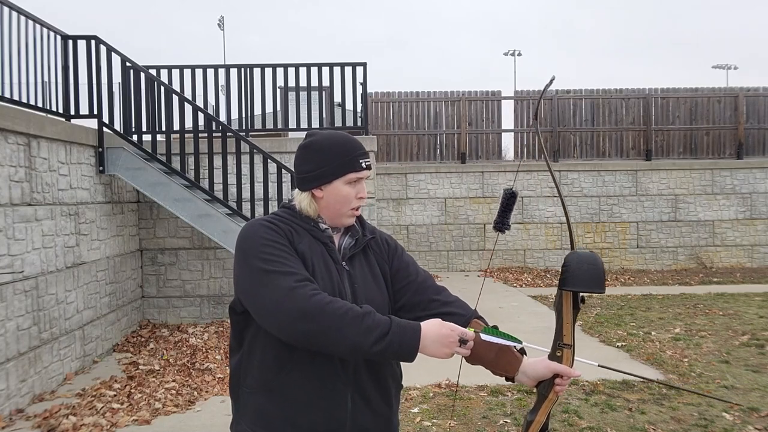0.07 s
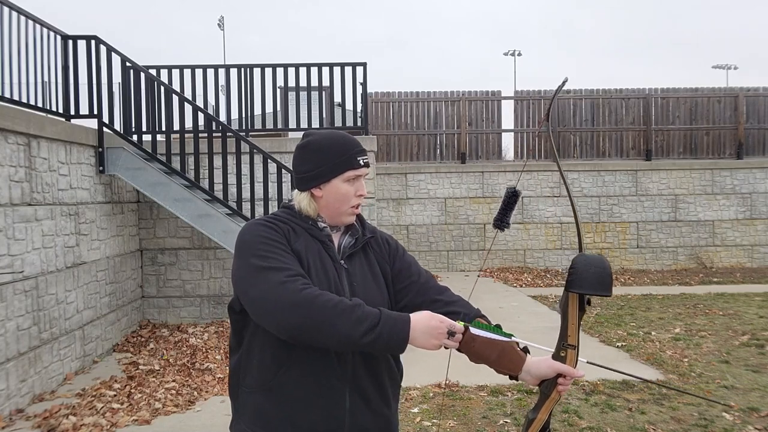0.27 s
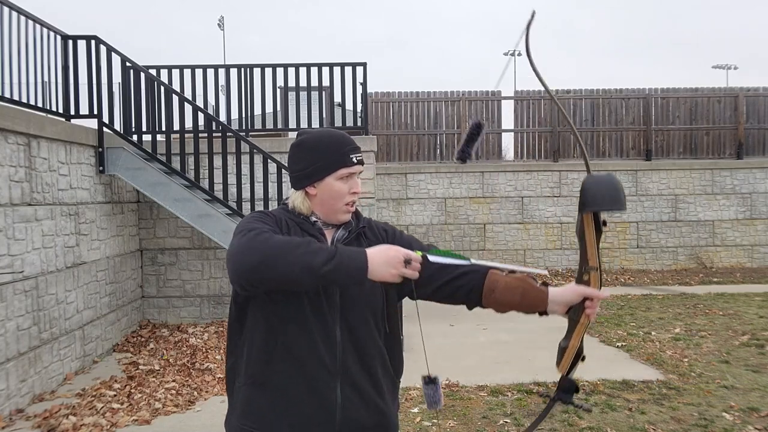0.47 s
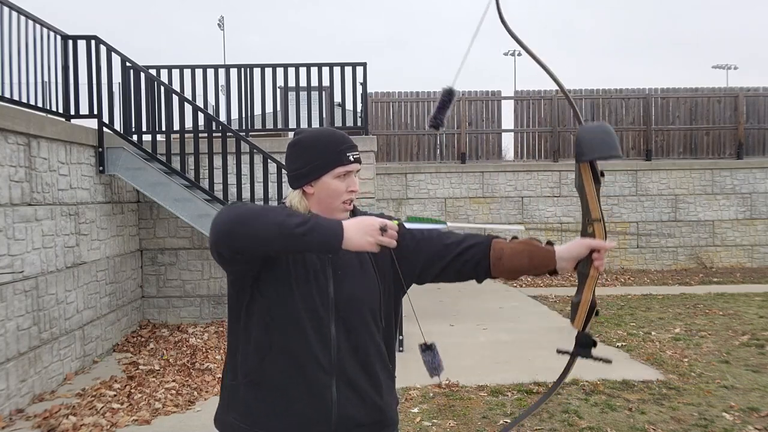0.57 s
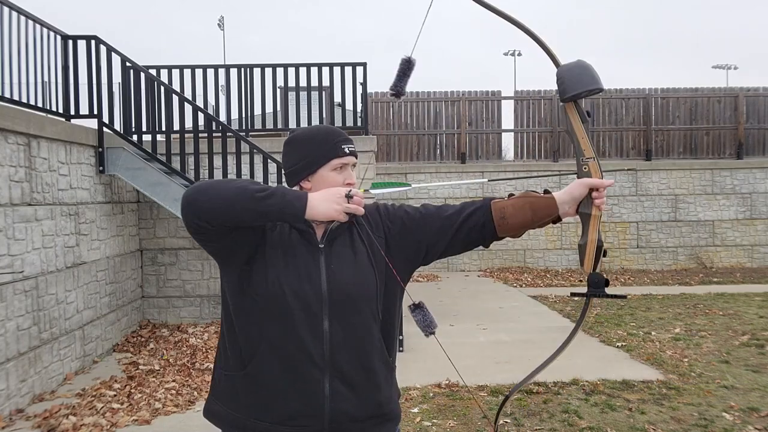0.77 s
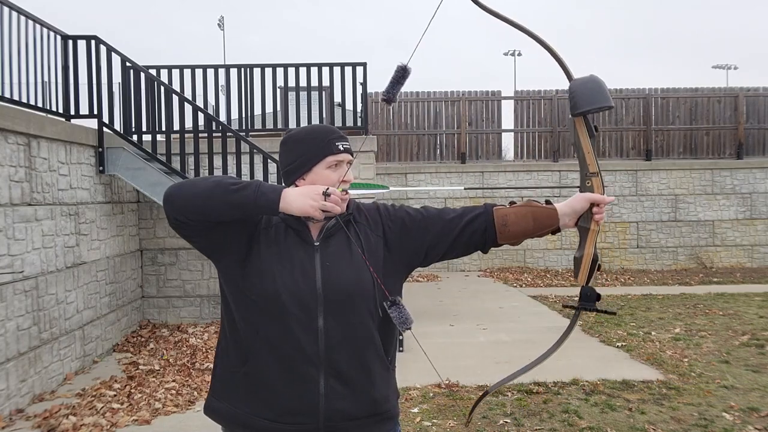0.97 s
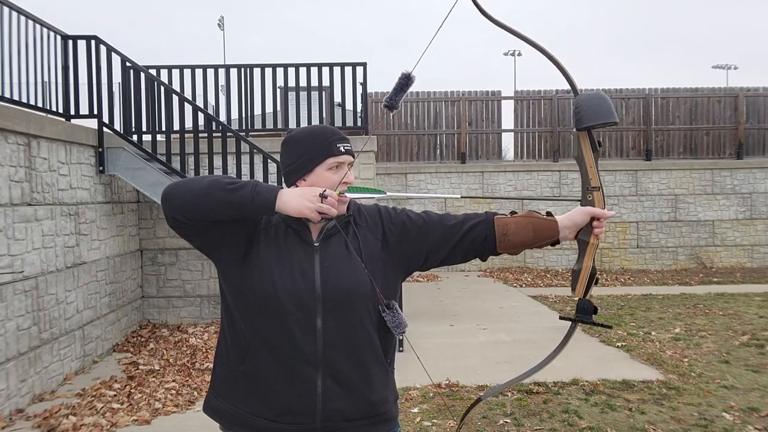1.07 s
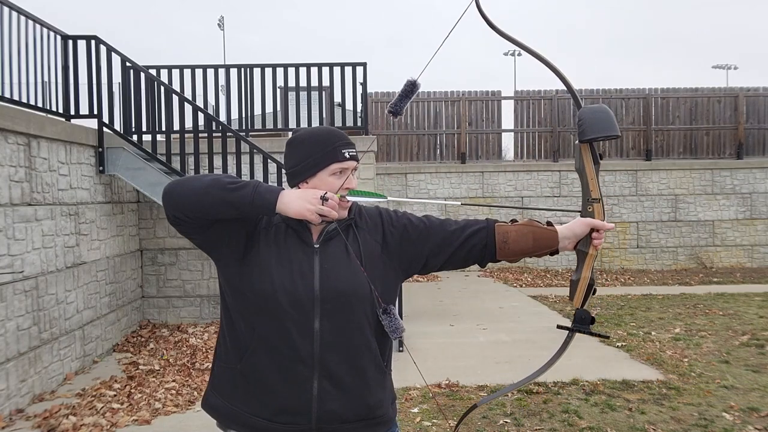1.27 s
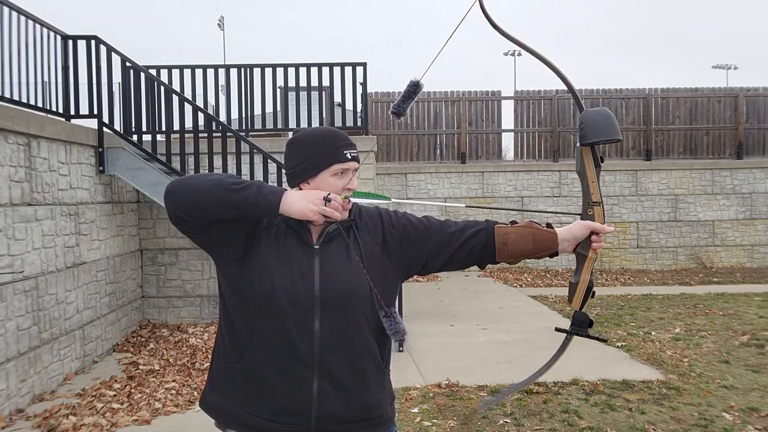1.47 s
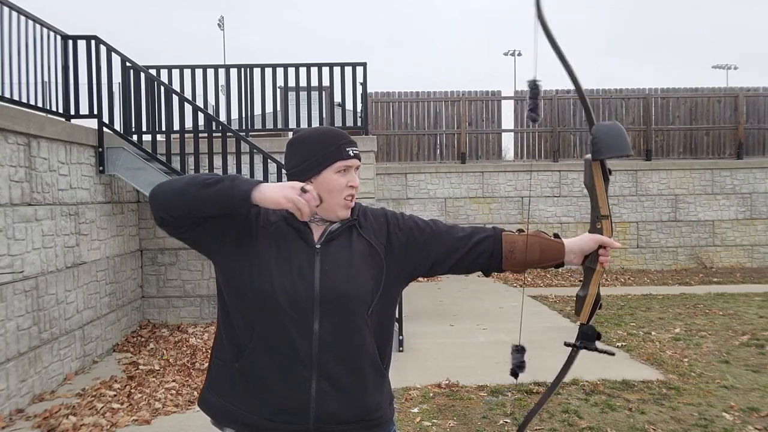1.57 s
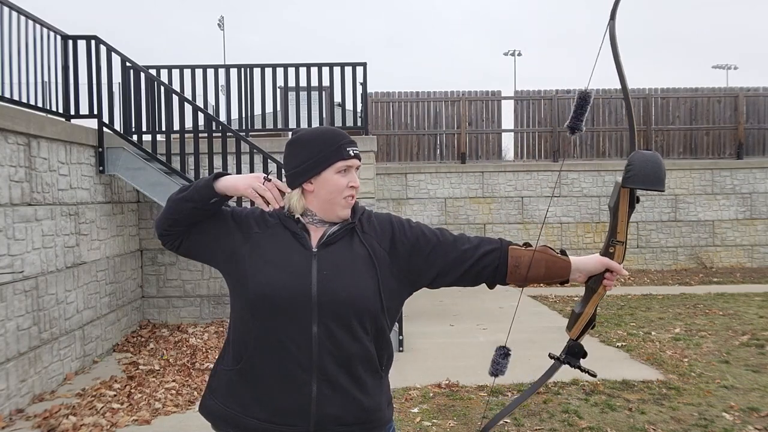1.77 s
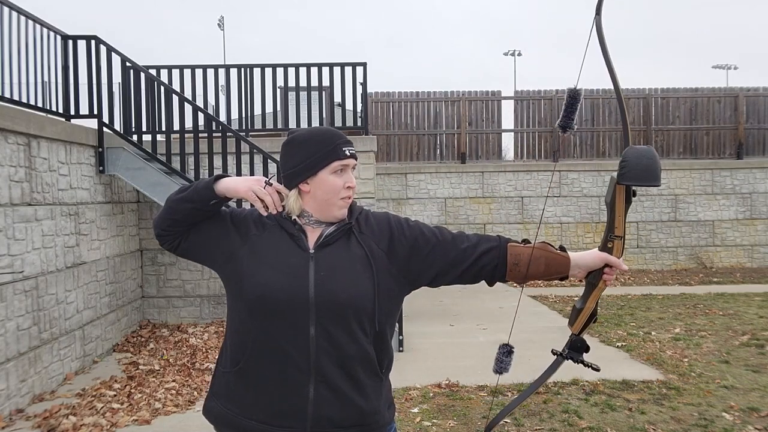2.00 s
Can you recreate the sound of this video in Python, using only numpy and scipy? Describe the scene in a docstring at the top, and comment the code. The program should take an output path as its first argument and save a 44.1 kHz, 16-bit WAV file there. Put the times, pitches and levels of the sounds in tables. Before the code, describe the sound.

Sharp woody slap of a recurve bow releasing, followed by a quick distant arrow impact outdoors

```python
"""Bow shot in a walled yard

A recurve bow is drawn: friction noise through shaft resonances as the shaft slides over the rest.
The string is loosed: coloured grit rasps, slaps ring limbs and riser as dying sines, ticks snap.
The arrow thuds into the target (struck modes, crunch noise); the walls throw it back as echoes and tails.
A low drone wavering in pitch and a distant noise wash lie under everything."""
import sys
import numpy as np
from scipy import signal
from scipy.fft import rfft, irfft
from scipy.io import wavfile
from scipy.ndimage import uniform_filter1d

SR = 44100
rng = np.random.default_rng(int(sys.argv[2]) if len(sys.argv) > 2 else 0)


def log_audio(samples):
    """Write samples as a 16-bit WAV file to the path given in sys.argv[1]."""
    # one column per channel
    frames = np.atleast_2d(samples).T
    # limit to full scale, then quantise
    limited = np.clip(frames, -1, 1)
    pcm = np.round(limited * 32767).astype(np.int16)
    wavfile.write(sys.argv[1], SR, pcm)


N = 89743

# decay of the yard's reflections: f/Hz, t60/s
YARD_DECAY = [(100, 0.1), (500, 0.22), (2000, .35), (6000, 0.19), (14000, 0.26)]
# decay from the farther walls: f/Hz, t60/s
FAR_DECAY = [(100, .5), (500, 0.44), (2000, 0.44), (6000, 0.7), (14000, .25)]
BACKGROUND_PAN_DB = -0.86  # left minus right


def amp(db):
    """Amplitude factor of a level in dB."""
    return 10 ** (np.asarray(db) / 20)


def evened(x):
    """Scale to unit RMS over all channels."""
    return x / np.sqrt(np.mean(x ** 2) + 1e-20)


def read(points, hz):
    """Interpolate (Hz, value) points along log frequency."""
    f, value = np.transpose(points)
    return np.interp(np.log(hz + 1), np.log(f + 1), value)


def level(curve, col=1):
    """Gain over the whole scene from (s, dB) points, -140 dB outside."""
    columns = np.transpose(curve)
    return amp(np.interp(np.arange(N) / SR, columns[0], columns[col], left=-140, right=-140))


def add(mix, s, sound):
    """Add a sound to the mix in place from time s, cut at the end."""
    part = mix[round(s * SR):][:len(sound)]
    part += sound[:len(part)]


def balance(pan_db):
    """Left and right gains, pan_db apart."""
    return amp([[pan_db / 2], [-pan_db / 2]])


def coloured(x, points):
    """Shape a spectrum by (Hz, dB) points, then scale to unit RMS."""
    hz = np.fft.rfftfreq(x.shape[-1], 1 / SR)
    return evened(irfft(rfft(x) * amp(read(points, hz)), x.shape[-1]))


def ring(modes, tilt_db_per_khz=0, turn=1):
    """Dying sines of a struck object, peak near 1; negative turn alternates the modes' polarity."""
    t = np.arange(SR // 4) / SR
    x = 0
    for k, (hz, db, t60) in enumerate(modes):
        decay = amp(db - tilt_db_per_khz * hz / 1000 - 60 * t / t60)
        x = x + turn ** k * decay * np.sin(2 * np.pi * hz * t)
    return x / sum(amp(db) for hz, db, t60 in modes) * 2


def placed(x, lead_s, pan_db):
    """Stereo position by arrival time (positive: left first) and level (positive: left louder)."""
    hz = np.fft.rfftfreq(len(x), 1 / SR)
    side = np.array([[1], [-1]])
    delay = np.exp(1j * np.pi * hz * (side - np.sign(lead_s)) * lead_s)
    return irfft(rfft(x) * delay, len(x)) * balance(pan_db)


def pair(draw, same):
    """Two channels sharing a fraction of their noise power."""
    same = np.clip(same, 0, 1)
    return np.sqrt(same) * draw[0] + np.sqrt(1 - same) * draw[1:]


def yard(x, decay):
    """Sparse reflections of random sign, each band dying at its own speed."""
    taps = np.zeros((2, SR // 2))
    slots = np.arange(300, SR // 2 - 20, 20)
    shape = (2, len(slots))
    at = slots + rng.integers(0, 20, shape)
    np.put_along_axis(taps, at, rng.choice([-1., 1.], shape), 1)
    hz, t, z = signal.stft(taps, SR, nperseg=256)
    tail = signal.istft(z * amp(-60 * t / read(decay, hz)[:, None]), SR, nperseg=256)[1]
    return signal.fftconvolve(x[None], tail / np.linalg.norm(tail[0]), axes=1)[:, :N]


def wander(s, count):
    """Slow chance: noise averaged twice over s seconds, unit RMS."""
    size = int(s * SR)
    noise = rng.standard_normal((count, N))
    return [evened(uniform_filter1d(uniform_filter1d(v, size), size)) for v in noise]


def resonate(x, hz, width_hz):
    """A steep resonance: one peak filter applied twice, unit RMS."""
    b, a = signal.iirpeak(hz, hz / width_hz, SR)
    return evened(signal.lfilter(b, a, signal.lfilter(b, a, x)))


def background():
    """Distant wash: noise with drifting time-frequency patches, slowly fading, over faint steady hiss."""
    # wash spectrum: f/Hz, level/dB per Hz (relative)
    wash_colour = [(50, -32), (85, 0.5), (108, -5), (205, -13.5), (304, -24), (354, -17), (425, -31),
                   (451, -27), (660, -21.5), (1090, -28.5), (1450, -30.5), (3200, -54), (4160, -84),
                   (7040, -120)]
    # left-right correlation of the wash: f/Hz, correlation (-1 to 1)
    likeness = [(60, 0.9), (150, 0.93), (380, 0.72), (950, -0.23), (2380, 0.98), (5980, 0.03),
                (15000, -0.55)]
    # hiss spectrum: f/Hz, level/dB per Hz (relative)
    hiss_colour = [(1500, -8), (3000, 1), (5000, -5.5), (9000, -10), (13000, -15.5), (16000, -6)]
    wash_db, hiss_db, patch_rms_db = -56.5, -89.5, 1.5
    fade_db_per_s = -2  # 0 dB at mid-scene
    frames, hz = N // 512 + 5, np.fft.rfftfreq(2048, 1 / SR)
    a, b, c, d, patches = rng.standard_normal((frames, 1025, 5)).T
    # smooth over 16 bins, then 8 frames
    patches = evened(uniform_filter1d(uniform_filter1d(patches, size=16, axis=0), size=8, axis=1))
    same = np.clip(read(likeness, hz), -1, 1)[:, None]
    left = a + 1j * b
    right = same * left + np.sqrt(1 - same ** 2) * (c + 1j * d)
    z = np.array([left, right]) * amp(read(wash_colour, hz)[:, None] + patch_rms_db * patches)
    wash = amp(wash_db) * evened(signal.istft(z, nperseg=2048, noverlap=1536)[1][:, :N])
    fade = amp(fade_db_per_s * (np.arange(N) - N / 2) / SR)
    hiss = amp(hiss_db) * coloured(rng.standard_normal((2, N)), hiss_colour)
    return (wash * fade + hiss) * balance(BACKGROUND_PAN_DB)


def drone():
    """A steady-level low sine whose pitch wavers at random, in low-frequency rumble noise."""
    # hum pitch: t/s, f/Hz
    pitch = [(0.0, 62.6), (0.16, 62.6), (0.3, 61.3), (2.03, 61.3)]
    # rumble spectrum: f/Hz, level/dB per Hz (relative)
    rumble_colour = [(15, -40.5), (30, -7.5), (50, 4), (65, 7), (90, 0.5), (140, -50)]
    hum_db, rumble_db = -53, -66
    wobble_rms_hz, wobble_s = 3, 0.019
    hz = np.interp(np.arange(N) / SR, *np.transpose(pitch)) + wobble_rms_hz * wander(wobble_s, count=1)[0]
    hum = amp(hum_db) * np.sqrt(2) * np.sin(2 * np.pi * np.cumsum(hz) / SR)
    rumble = amp(rumble_db) * coloured(rng.standard_normal(N), rumble_colour)
    return (hum + rumble) * balance(BACKGROUND_PAN_DB)


def slide():
    """Friction noise through shaft resonances, which take turns as the free length changes."""
    # draw over the rest: t/s, level/dB
    stroke = [(0.2, -91), (0.312, -76.5), (0.394, -73), (0.512, -75.5), (0.518, -74.5), (0.59, -71.5),
              (0.596, -69.5), (0.8, -102)]
    # shaft resonances: f/Hz, width per filter pass/Hz, level/dB, loudest at t/s
    shaft = [(1310, 130, 4.5, .46), (3673, 114, -6.5, .57), (3720, 320, -7.5, 0.3), (4770, 870, -6.5, 0.41),
             (5700, 170, -25, 0.7), (5870, 600, -10, 0.28), (6800, 600, -4, 0.14)]
    spread_s, hiss_db, same = .13, -10, .5
    judder_rms_db, judder_s = 1.5, 0.019
    t = np.arange(N) / SR
    noise = pair(rng.standard_normal((3, N)), same)
    rings = np.zeros((2, N))
    for hz, width_hz, db, s in shaft:
        turn = np.exp(-((t - s) / spread_s) ** 2)
        rings += amp(db) * turn * resonate(noise, hz, width_hz)
    band = signal.butter(4, [3000, 7500], "band", fs=SR, output="sos")
    hiss = amp(hiss_db) * evened(signal.sosfilt(band, noise))
    judder = amp(judder_rms_db * wander(judder_s, count=1)[0])
    return level(stroke) * judder * (rings + hiss)


def rasp():
    """Shaft and string rush past the bow: dense uneven grit coloured by the bow, its top band dying first."""
    # rush: t/s, main level/dB, top-band level/dB
    rush = [(1.488, -50, -53.5), (1.4974, -38.5, -57.5), (1.4984, -18.5, -33), (1.506, -19.5, -33.5),
            (1.511, -14.5, -26), (1.519, -16.5, -28), (1.53, -26, -43), (1.545, -36, -60.5),
            (1.57, -48, -69.5)]
    # main spectrum: f/Hz, level/dB per Hz (relative)
    main_colour = [(530, -23.5), (900, -3), (1720, -11.5), (2040, -10.5), (2580, -16), (2780, -16.5),
                   (4570, -10.5), (5470, -11.5), (6000, -13), (7450, -17.5), (8500, -21.5), (11000, -51.5),
                   (18700, -120)]
    # top-band spectrum: f/Hz, level/dB per Hz (relative)
    top_colour = [(6500, -41), (8200, -3.5), (10500, -8.5), (14500, -3), (16000, -12)]
    grit_db, grits_per_s, same = 2.5, 16000, .3
    top_pan_db, yard_db, far_db = 2.5, -20, -28.5
    strength = amp(grit_db * np.minimum(rng.exponential(1, (3, N)), 5))
    grit = strength * (rng.random((3, N)) < grits_per_s / SR)
    noise = pair(grit * rng.standard_normal((3, N)), same)
    top = coloured(noise, top_colour) * balance(top_pan_db)
    out = level(rush) * coloured(noise, main_colour) + level(rush, col=2) * top
    mono = out.mean(0)
    return out + amp(yard_db) * yard(mono, YARD_DECAY) + amp(far_db) * yard(mono, FAR_DECAY)


def slaps_and_echo():
    """The string slaps, bounces and a late soft echo: soft pulses ring limbs and riser; the string swings on."""
    # slaps, the last an echo: t/s, limb level/dB, riser level/dB
    slaps = [(1.4984, -44.5, -30.5), (1.5035, -25, -24.5), (1.51, -11.5, -30.5), (1.5127, -28.5, -4.5),
             (1.518, -24, -12.5), (1.524, -16, -16.5), (1.531, -24.5, -26), (1.557, -34, -26),
             (1.572, -39, -42), (1.594, -36.5, -40)]
    # limb modes: f/Hz, level/dB, t60/s
    limb_modes = [(205, 1, 0.039), (250, -1, 0.051), (310, -5, 0.073), (368.7, -3, 0.083)]
    # riser modes: f/Hz, level/dB, t60/s
    riser_modes = [(548.7, -9.5, .06), (745, 5.5, 0.023), (936, -9, 0.029), (1120, -4, 0.017),
                   (1300, -14.5, .03), (1710, -4.5, .025)]
    contact_s = 0.00058  # to the pulse peak
    twang_s, twang_hz, twang_db, twang_rise_s, twang_t60_s = 1.51, 111, -13.5, 0.023, 0.13
    out, t = np.zeros(N), np.arange(300) / SR
    push = np.exp(-((t - contact_s) / contact_s * 2) ** 2)
    push /= push.sum()
    limbs = np.convolve(ring(limb_modes), push)
    riser = np.convolve(ring(riser_modes), push)
    for s, limb_db, riser_db in slaps:
        add(out, s - contact_s, amp(riser_db) * riser - amp(limb_db) * limbs)
    u = np.arange(SR // 2) / SR
    swing = amp(twang_db - 60 * u / twang_t60_s) * (1 - np.exp(-(u / twang_rise_s) ** 2))
    add(out, twang_s, swing * np.sin(2 * np.pi * twang_hz * u))
    return out


def sharp_ticks():
    """Nock, serving and fletching tick: damped cycles with a spit of noise."""
    # ticks: t/s, level/dB, f/Hz
    tick_list = [(1.4984, -4.5, 1800), (1.5001, -16.5, 1600), (1.509, -18, 4500), (1.5095, -7.5, 5000),
                 (1.5131, -9, 5500), (1.517, -12, 5000), (1.5185, -6.5, 5000)]
    decay_s, hiss = .0006, 0.31  # time constant; noise per unit sine
    out, t = np.zeros(N), np.arange(300) / SR
    for s, db, hz in tick_list:
        cycles = np.sin(2 * np.pi * hz * t) + hiss * rng.standard_normal(300)
        add(out, s, amp(db) * np.exp(-t / decay_s) * cycles)
    return out


def bow():
    """Slaps with their echo and ticks share an arrival lead, have their own pan, and reflect in the yard."""
    lead_s, slap_pan_db, tick_pan_db, wet_db = .00012, 1.5, 5, -18.5
    slaps, ticks = slaps_and_echo(), sharp_ticks()
    direct = placed(slaps, lead_s, slap_pan_db) + placed(ticks, lead_s, tick_pan_db)
    return direct + amp(wet_db) * yard(slaps + ticks, YARD_DECAY)


def target():
    """A blow and short crunch ring face and shaft over a low thud; echoes have their own dullness and side."""
    # hit, then echoes: t/s, level/dB, thud level/dB, dullness/(dB/kHz), left lead/s, left minus right/dB
    hits = [(1.6685, -32, -30.5, 0.3, .0005, 4), (1.685, -36, -34.5, -.3, -.00047, -5),
            (1.7313, -32, -37.5, 3.5, .00013, -1.5), (1.832, -53.5, -55.5, 2, .00007, -9)]
    # face and shaft modes: f/Hz, level/dB, t60/s
    face_modes = [(1080, -9, .035), (1500, -12, .02), (1920, -2, .028), (2260, -1, .025), (3650, -14, .012),
                  (4300, -8, .014), (4600, -4, .022), (6150, -18, .006), (7400, -18, .006)]
    # thud modes: f/Hz, level/dB, t60/s
    thud_modes = [(66.46, -17, 0.24), (118, -2, 0.03), (262.5, -9.5, 0.032), (575, -13.5, 0.018)]
    # crunch spectrum: f/Hz, level/dB per Hz (relative)
    crunch_colour = [(300, -10), (1000, 4), (2500, -3), (5000, -4), (9000, -16.5), (16000, -25)]
    crunch_db, crunch_s, rise_s = -6, .006, .002
    crunch_khz = 2.5  # middle of the crunch, for its dulling
    rattle, wet_db, ring_wet_db = 0.62, -7, -4
    rings, rest, t = np.zeros((2, N)), np.zeros((2, N)), np.arange(1600) / SR
    shape = (1 - np.exp(-(t / rise_s) ** 2)) * np.exp(-t / crunch_s)
    for s, db, thud_db, dull_db_per_khz, lead_s, pan_db in hits:
        noise = rng.standard_normal(1600)
        tone, body = np.zeros(N), np.zeros(N)
        modes = amp(db) * ring(face_modes, dull_db_per_khz, turn=-0.98)
        burst = noise * shape / np.linalg.norm(shape)
        add(tone, s, modes)
        add(tone, s - rise_s, rattle * signal.fftconvolve(burst, modes))
        crunch_gain = amp(db + crunch_db - dull_db_per_khz * crunch_khz)
        add(body, s - rise_s, crunch_gain * coloured(noise, crunch_colour) * shape)
        add(body, s + crunch_s, amp(thud_db) * ring(thud_modes))
        rings += placed(tone, lead_s, pan_db)
        rest += placed(body, lead_s, pan_db)
    send = (rest + amp(ring_wet_db) * rings).mean(0)
    return rings + rest + amp(wet_db) * yard(send, FAR_DECAY)


def scene():
    """Sum of all layers in stereo."""
    return background() + drone() + slide() + rasp() + bow() + target()


def record(dry):
    """Low cut and upper band limit."""
    low_cut_hz, edge_hz = 25, 16250
    high_pass = signal.butter(2, low_cut_hz, "high", fs=SR, output="sos")
    low_pass = signal.firwin(1023, edge_hz, window=("kaiser", 12), fs=SR)
    return signal.oaconvolve(signal.sosfilt(high_pass, dry), low_pass[None], "same")


dry = scene()
out = record(dry)
log_audio(out)
```